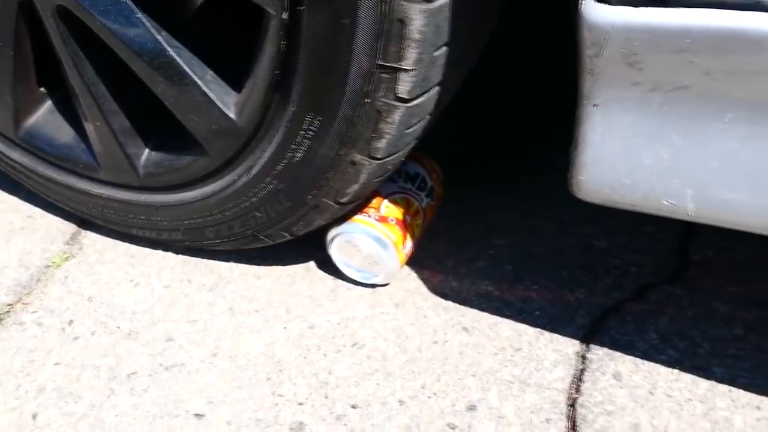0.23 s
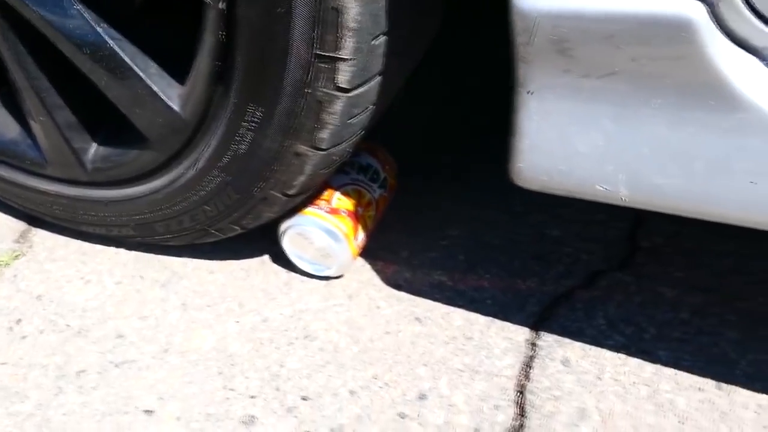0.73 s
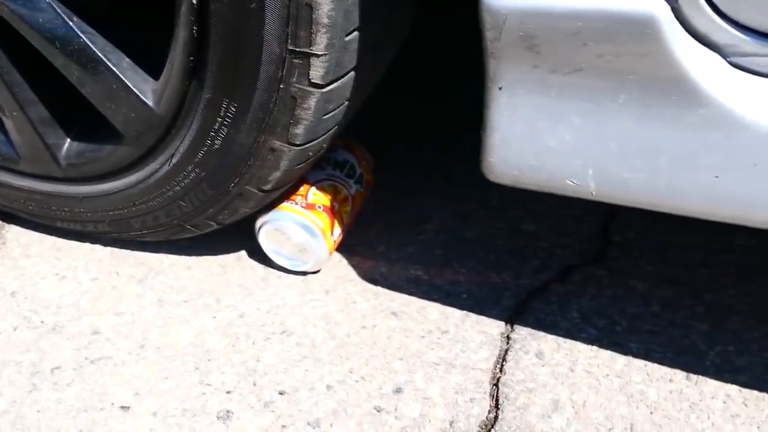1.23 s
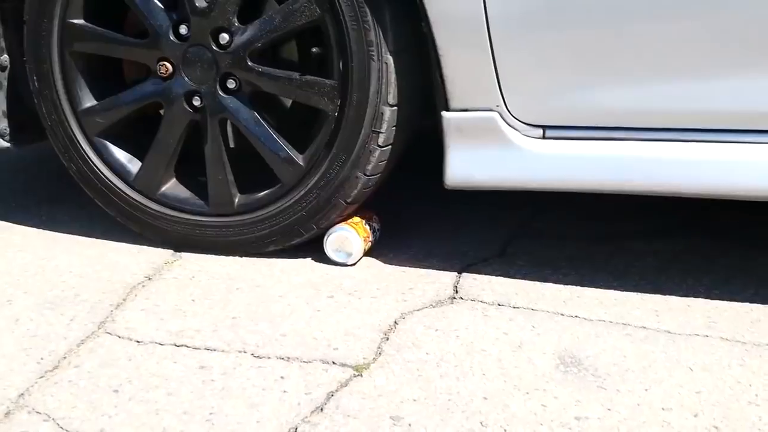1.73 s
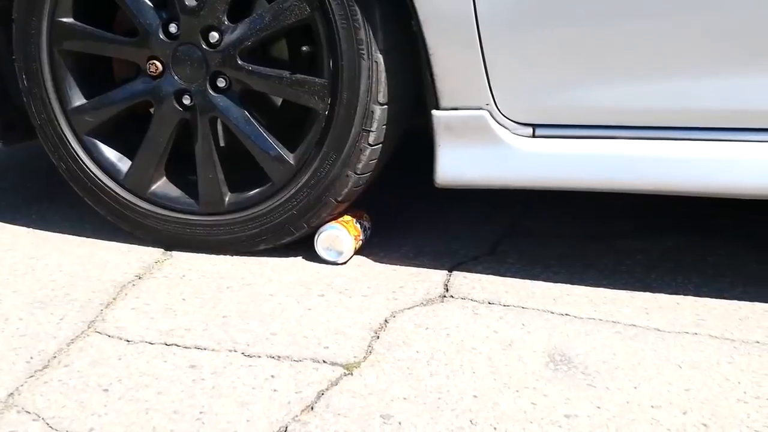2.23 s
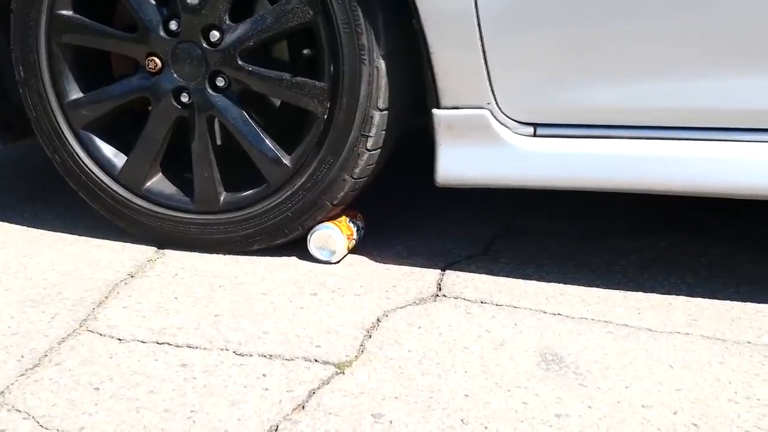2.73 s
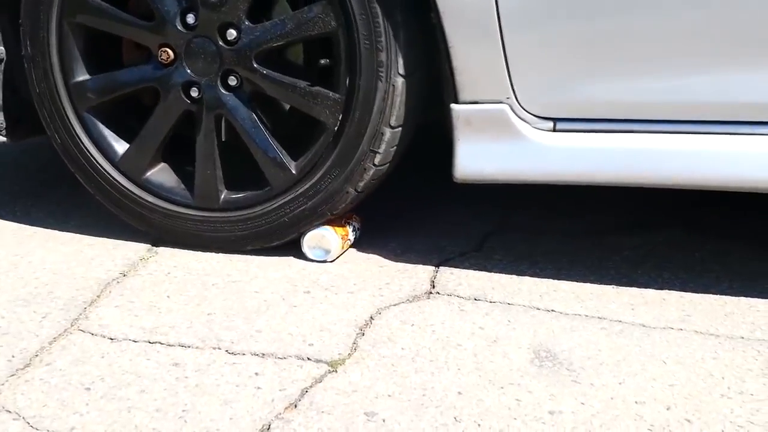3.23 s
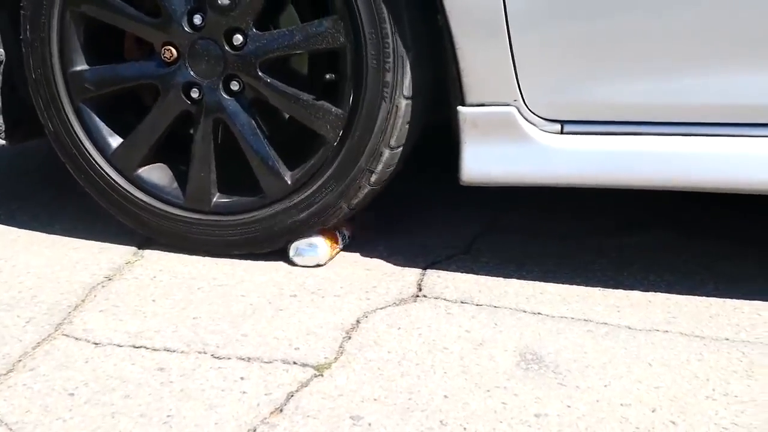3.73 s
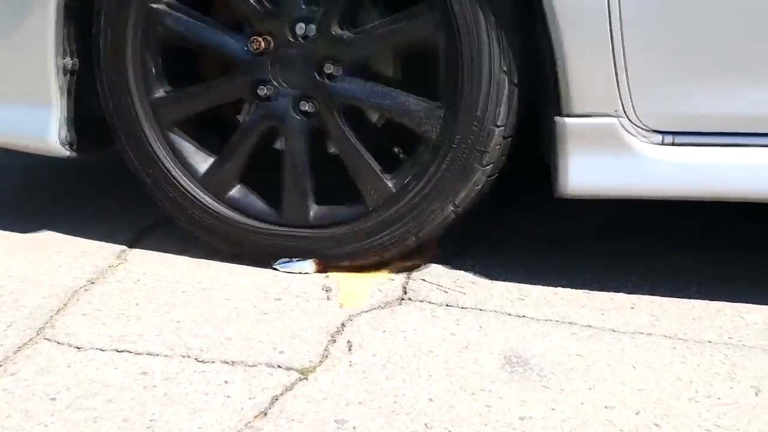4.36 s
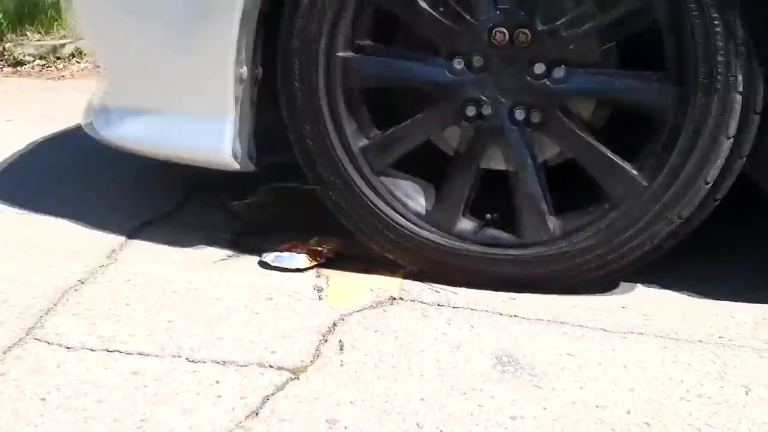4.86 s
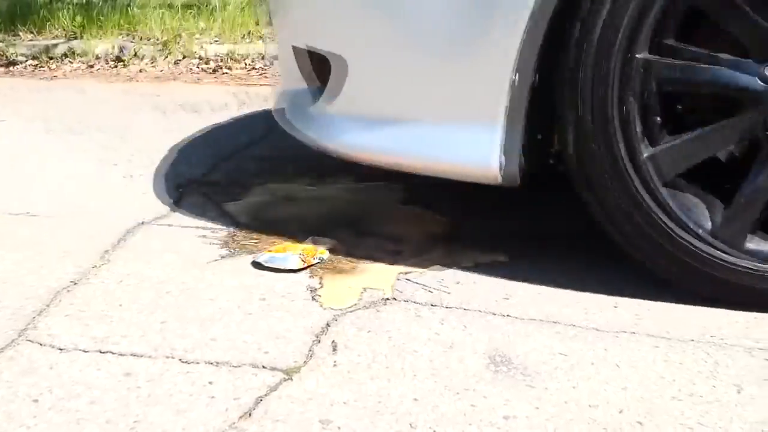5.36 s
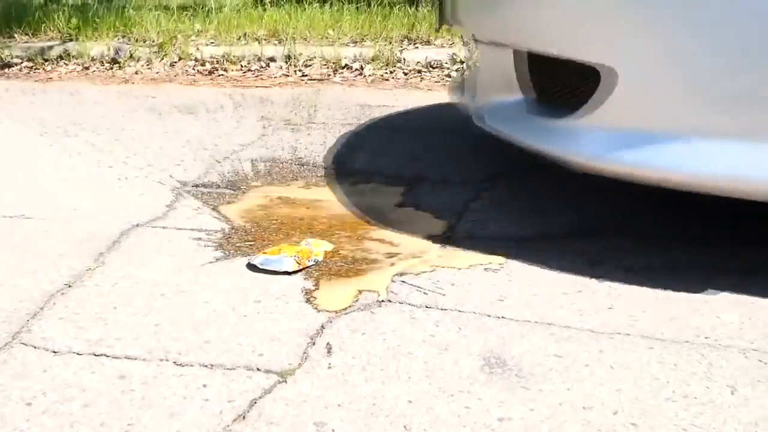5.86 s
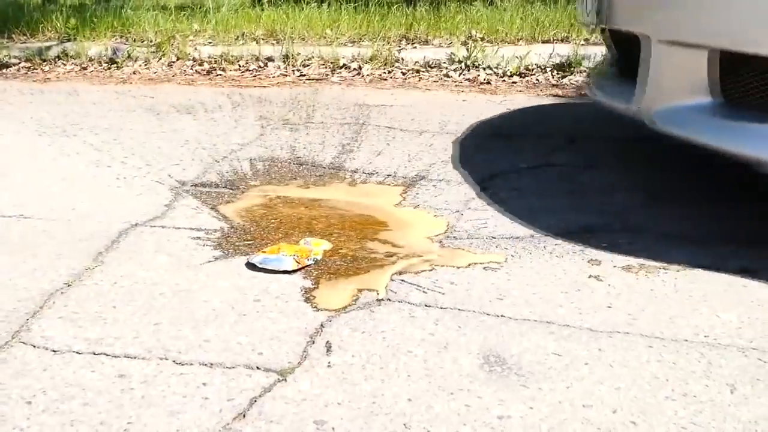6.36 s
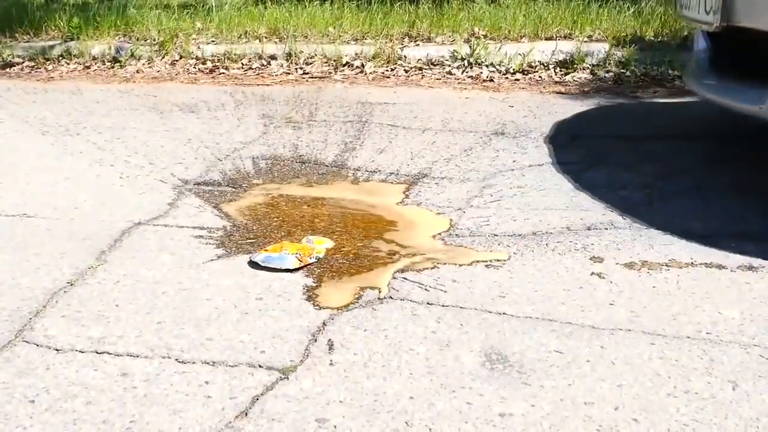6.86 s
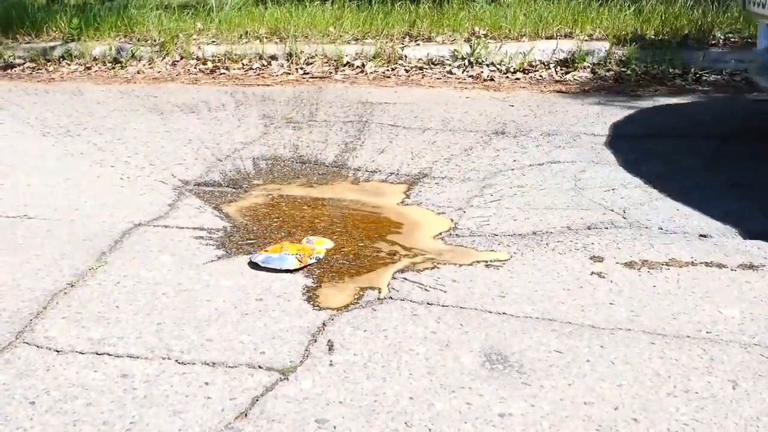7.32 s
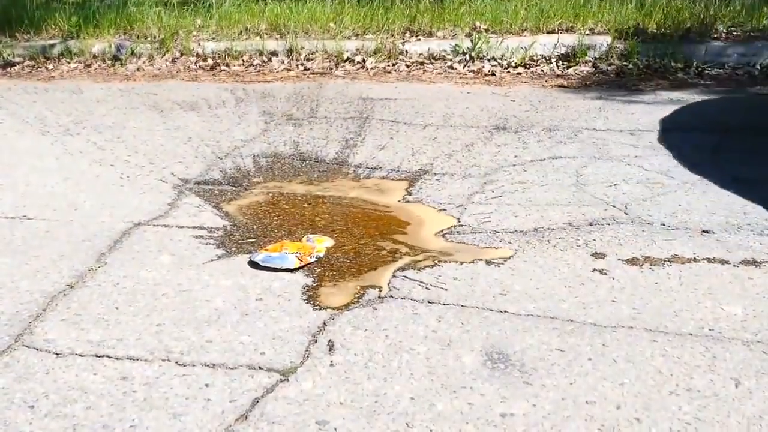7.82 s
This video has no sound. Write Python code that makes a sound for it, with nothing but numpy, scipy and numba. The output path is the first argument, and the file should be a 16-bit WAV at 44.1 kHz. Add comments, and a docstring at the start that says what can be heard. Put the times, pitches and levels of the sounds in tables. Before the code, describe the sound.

Close to the ground outdoors, a tyre slowly presses a drink can. Hollow thuds and thin metallic clicks come in quick irregular succession, strongest at first, then softer and steady. Later the crumple grows rustly, gritty and bubbly with spilling drink. After a short pause a huge bang overloads the close stereo microphone and rings away. Low hum and rumbling sway lie beneath.

```python
"""On the ground, close to a stereo microphone, a tyre creeps over a drink can. The wall buckles in a quick
series of snaps: pulses of air, cracks and knocks of shaped noise, and decaying modes of the hollow body.
Clumped noise rustles as metal and grit, short tones bubble as spilt drink, and slow sines rock the support.
A faint gliding sine squeaks midway; after the last snaps comes a short pause, then a loud burst overloads
the input."""
import sys
import numpy as np
from scipy import signal
from scipy.fft import rfft, irfft, next_fast_len
from scipy.io import wavfile
from scipy.ndimage import uniform_filter1d, map_coordinates
from numba import njit

SR = 44100
rng = np.random.default_rng(int(sys.argv[2]) if len(sys.argv) > 2 else 0)


def wav_record(signal):
    """Record a signal, one row per channel, as 16-bit PCM in the file named by sys.argv[1]."""
    frames = np.transpose(np.atleast_2d(signal))
    bounded = np.clip(frames, -1, 1)
    # unit amplitude maps onto the largest positive 16-bit level
    quanta = np.round(bounded * 32767).astype(np.int16)
    wavfile.write(sys.argv[1], SR, quanta)


N = 356769


def amp(db):
    """Decibel law: level to amplitude ratio."""
    return 10 ** (np.asarray(db) / 20)


def unit(x):
    """Normalisation to unit root-mean-square amplitude."""
    return x / np.sqrt(np.mean(x ** 2) + 1e-20)


def along(points, hz):
    """Interpolation of (f/Hz, value) points on a logarithmic frequency axis."""
    f, v = np.transpose(points)
    return np.interp(np.log(hz + 1), np.log(f + 1), v)


def curves(rows):
    """Linear interpolation in time of each column after t/s, and a gate that is open while the rows last."""
    s, *columns = np.transpose(rows)
    t = np.arange(N) / SR
    gate = np.clip(np.minimum(t - s[0], s[-1] - t) / 0.031, 0, 1)
    return [np.interp(t, s, c) for c in columns] + [gate]


def wobble(rate):
    """Band-limited randomness: a spline through random knots, rate knots a second."""
    knots = rng.standard_normal(int(N * rate / SR) + 4)
    return map_coordinates(knots, [np.arange(N) * rate / SR])


def filtered(x, response):
    """Linear filtering: the spectrum of x times a response of frequency."""
    m = next_fast_len(N + SR // 4)
    x = np.concatenate([x, x[..., :-SR // 8:-1]], axis=-1)  # the end is mirrored so that it does not ring
    return irfft(rfft(x, m) * response(np.fft.rfftfreq(m, 1 / SR)), m)[..., :N]


@njit
def add_decaying_sines(out, at, hz, gain, t60, rate):
    """Damped free vibration: each mode is a rotating and shrinking phasor, cut off after its t60."""
    for k in range(len(hz)):
        step = np.exp((2j * np.pi * hz[k] - np.log(1000) / t60[k]) / rate)
        phasor = gain[k] + 0j
        for i in range(at, min(len(out), at + int(t60[k] * rate))):
            out[i] += phasor.imag
            phasor *= step


# Likeness of left and right: f/Hz, correlation coefficient
LIKENESS = [(60, -0.89), (130, 0.58), (290, 0.87), (640, 0.68), (1410, 0.59), (3100, 0.52), (6820, 0.34),
            (15000, -0.45)]


def spread(pair, spectrum):
    """Interchannel coherence: two unrelated signals are coloured and mixed as mid and side."""
    def turn(hz):
        return np.arccos(np.clip(along(LIKENESS, hz), -1, 1)) / 2

    def response(hz):
        return amp(along(spectrum, hz)) * [np.cos(turn(hz)), np.sin(turn(hz))]

    mid, side = filtered(pair, response)
    return np.array([mid + side, mid - side])


# Spectrum of the steady background: f/Hz, relative level/dB (per Hz)
BACKGROUND_SPECTRUM = [(15, -2), (30, 15), (50, 14.5), (80, -11), (420, -18), (700, -23.5), (1400, -30),
                       (2100, -32.5), (2900, -34.5), (3500, -39.5), (9000, -44.5), (14000, -44),
                       (17000, -62)]
BACKGROUND_DB = -46.5  # rms level/dB re full scale


def background():
    """Stationary coloured noise, partly coherent between the channels."""
    noise = spread(rng.standard_normal((2, N)), BACKGROUND_SPECTRUM)
    return amp(BACKGROUND_DB) * unit(noise)


# Strength of the sway: t/s, relative level/dB
ROCKING = [(.06, -27), (.19, -20), (.32, -32), (1.25, -27), (1.9, -33), (2.55, -23.5), (3.6, -25.5),
           (4.75, -27), (5.0, -31), (5.15, -17), (5.5, -24.5), (6.15, -33), (6.35, -24.5), (6.65, -35),
           (7.3, -26.5), (7.47, -22.5), (7.73, -38)]


def rocking():
    """Low-frequency oscillation: the microphone's support sways unevenly near 26 Hz, out of phase left to right."""
    db, gate = curves(ROCKING)
    phase = 2 * np.pi * np.cumsum(26.0 + 2.14 * wobble(5.1)) / SR
    sway = gate * amp(db + 1.0 + 5.5 * wobble(48)) * np.sin(phase)
    # the burst sets off one clean damped swing
    t = np.maximum(np.arange(N) / SR - 7.903, 0)
    swing = -.85 * amp(-60 * t / 0.88) * np.sin(2 * np.pi * 25 * t)
    return (sway + swing) * [[.85], [-1.15]]


# The clear buckles: t/s, then relative level/dB of knock, crack, body
BUCKLES = [(0.0914, -16, -30.5, -14.5), (0.1185, -22.5, -29, -17.5), (.226, -27, -43.5, -21.5),
           (.2849, -52, -52, -55), (.3053, -28, -48, -22.5), (0.4377, -20.5, -32.5, -20.5),
           (0.4713, -41, -53, -38), (0.5313, -31, -49, -29), (0.5503, -21, -42.5, -21.5),
           (0.623, -35.5, -43.5, -24.5), (0.683, -44, -50, -43), (0.6887, -19, -39.5, -18),
           (.7104, -46, -49, -25.5), (.7982, -50, -46.5, -39), (0.825, -47, -49, -29.5),
           (0.8554, -40, -58, -50), (.864, -25, -42, -15), (0.8876, -24.5, -48, -24),
           (0.9805, -41, -47, -32), (1.013, -33, -44, -23.5), (1.0454, -24.5, -46, -19.5),
           (1.0687, -19.5, -42.5, -18), (1.1802, -38, -41.5, -27.5), (1.2138, -35.5, -41.5, -23.5),
           (1.2608, -29, -51, -18.5), (1.2712, -20, -44, -17.5), (1.3791, -52, -47, -35.5),
           (1.406, -40, -48.5, -26.5), (1.4381, -36, -41, -22), (1.4686, -22, -43, -21),
           (1.5649, -44, -46.5, -32), (1.6063, -36, -47, -27), (1.6277, -29, -41.5, -19),
           (1.6788, -25.5, -38.5, -21), (1.7612, -52, -54, -47), (1.8186, -41, -55, -34),
           (1.8336, -48, -51, -32), (1.8624, -27, -37.5, -21.5), (1.9613, -44, -52, -42.5),
           (2.0136, -48, -50, -32.5), (2.051, -22.5, -50, -18.5), (2.1199, -23.5, -41, -18.5),
           (2.2035, -34, -45.5, -24), (2.2475, -46, -47.5, -39), (2.3081, -31.5, -40.5, -27.5),
           (2.382, -54, -54, -55), (2.424, -32, -43, -25.5), (2.431, -31.5, -47, -25),
           (2.471, -26, -41, -19), (2.518, -25, -46, -30), (2.6074, -40, -47, -41),
           (2.6298, -40, -49, -26.5), (2.6696, -34, -47, -31), (2.7088, -33.5, -42, -32),
           (2.8056, -46, -52, -29), (2.829, -30, -41, -22), (2.8506, -60, -47, -33),
           (2.8979, -37, -54, -30.5), (2.9416, -36, -42, -27.5), (3.05, -39, -46, -29.5),
           (3.1541, -37.5, -44.5, -30), (3.1818, -38, -44, -27.5), (3.283, -53, -53, -31),
           (3.288, -37.5, -41, -24), (3.3847, -33.5, -44, -31), (3.4181, -43, -44, -29),
           (3.521, -33.5, -44, -31.5), (3.6156, -37, -45.5, -29), (3.6505, -42, -46.5, -27.5),
           (3.7426, -33, -44.5, -26.5), (3.754, -57, -47, -28), (3.8455, -37, -45, -35),
           (3.8749, -32.5, -44, -27), (3.9575, -50, -54, -75), (3.977, -67, -55, -28),
           (3.9845, -38, -45, -26.5), (4.071, -47, -47.5, -30), (4.1148, -35, -48, -25.5),
           (4.2025, -33, -50, -44), (4.2105, -31.5, -47, -26.5), (4.3036, -44, -50.5, -25),
           (4.3495, -39, -56, -25), (4.4105, -46, -51, -42), (4.4378, -40, -52, -34),
           (4.4452, -34, -47, -24.5), (4.526, -35.5, -52.5, -28.5), (4.5735, -27.5, -50, -18),
           (4.6537, -43, -47, -36), (4.6666, -53, -46, -28), (4.6781, -39, -50, -24.5),
           (4.781, -36.5, -45, -27.5), (4.8155, -41, -50.5, -29), (4.8996, -46, -44, -40),
           (4.9172, -32.5, -42.5, -24.5), (4.939, -65, -54, -25), (5.0269, -47, -47.5, -36),
           (5.073, -71, -54, -31), (5.1482, -45, -52, -25.5), (5.1843, -28.5, -64, -49),
           (5.214, -51, -52, -25), (5.2869, -16, -57, -14.5), (5.3386, -38, -71, -26.5),
           (5.4338, -63, -68, -27.5), (5.4624, -34, -67, -36), (5.519, -24.5, -44, -40),
           (5.529, -25, -49, -21.5), (5.542, -38, -60, -33), (5.6438, -25.5, -41, -21.5),
           (5.727, -31, -60, -26), (5.7933, -34.5, -51, -42), (5.8372, -19, -51, -18),
           (5.932, -23.5, -51, -30), (5.9811, -20.5, -42, -26.5), (5.9953, -24, -60, -27),
           (6.0362, -28, -40.5, -28.5), (6.1391, -36, -40, -36.5), (6.173, -26, -58, -25.5),
           (6.181, -25.5, -52, -26.5), (6.229, -23, -32.5, -22.5), (6.3161, -29.5, -39.5, -37),
           (6.3476, -27, -46, -31), (6.4166, -37, -43, -38), (6.4772, -33, -49, -42),
           (6.5046, -30, -64, -41), (6.5694, -40, -42, -38), (6.5845, -60, -30, -57),
           (6.6477, -49, -35, -53), (6.6711, -26.5, -57, -34), (6.6824, -31, -51, -31),
           (6.7556, -38.5, -61, -49), (6.779, -60, -37, -47), (6.7949, -33.5, -40, -41),
           (6.8589, -41, -50, -44), (6.8783, -42, -51, -52), (6.889, -23.5, -42, -37),
           (6.9076, -30.5, -45, -33), (6.9393, -41, -40, -36), (6.9912, -26, -43, -29.5),
           (7.023, -31.5, -50, -52), (7.0637, -45, -53, -38), (7.1327, -32.5, -63, -40),
           (7.1502, -23, -51, -32.5), (7.1629, -30, -37, -32), (7.1892, -54, -45, -40),
           (7.226, -23.5, -39, -36.5), (7.268, -29, -50, -42), (7.319, -54, -38, -37),
           (7.349, -37, -58, -38), (7.3742, -32.5, -69, -27), (7.4227, -30.5, -46, -40),
           (7.452, -28.5, -33, -16.5), (7.4664, -35, -50, -38)]
# Blows of the last burst: t/s, then relative level/dB of knock, crack, boom, body, sideways ring
BURST = [(7.8851, 1, -18, -33, -35, -4), (7.8875, -23, -10.5, -21, -0.5, -34),
         (7.8919, -4.5, -9, -1, -36, -5), (7.897, -25, -34, -4.5, -6, -3), (7.909, -13, -29, -9, -9.5, -29),
         (7.926, -12, -33, -21, -36, -20)]
# Low boom of a buckle of average body: t/s, relative level/dB
BOOM = [(.09, -16), (.3, -29.5), (.45, -20), (1, -28.5), (2.3, -25), (2.6, -21.5), (3, -26.5), (3.5, -20.5),
        (4.8, -23), (5.1, -19), (5.45, -24.5), (5.55, -34), (5.85, -25), (6.3, -32.5), (6.55, -34),
        (7.3, -30.5), (7.45, -20.5)]
AVERAGE_BODY_DB, AVERAGE_SIDE_DB = -26, -30  # relative levels of an average buckle
BOOM_FOLLOWS, SIDE_FOLLOWS = 0.27, 0.84  # dB of boom and of sideways ring per dB of body


def blows():
    """Level scaling: boom and sideways ring grow with the body of each buckle; the burst is appended."""
    s, knock_db, crack_db, body_db = np.transpose(BUCKLES)
    above_average = body_db - AVERAGE_BODY_DB
    boom_db = np.interp(s, *np.transpose(BOOM)) + BOOM_FOLLOWS * above_average
    side_db = AVERAGE_SIDE_DB + SIDE_FOLLOWS * above_average
    return list(zip(s, knock_db, crack_db, boom_db, body_db, side_db)) + BURST


def ring(modes, strength, scatter_db, detune):
    """Modal excitation: each blow gives the modes new strengths and slightly new pitches (Hz, gain, t60)."""
    hz, db, t60 = np.transpose(modes)
    luck = rng.standard_normal((2, len(modes)))
    gain = amp(db + along(strength, hz) + scatter_db * luck[0])
    return hz * (1 + detune * luck[1]), gain, np.abs(t60)


# Modes in phase on both sides: nominal f/Hz, relative level/dB, t60/s
CENTRE_MODES = [(54.3, -36, 0.58), (89.2, -7, 0.36), (93.3, -3.5, 0.25), (130, -11.5, 0.53),
                (169.1, -9.5, 0.38), (237.8, 0, 0.099), (302.8, -0.5, 0.091), (443, -15.5, 0.16),
                (561.4, -3, 0.091), (723.4, -15, 0.12), (940, -49, 0.055), (1130, -26, 0.12),
                (1329, -56, 0.11), (1650, -61, 0.035)]
# Modes in opposite phase on the two sides: nominal f/Hz, relative level/dB, t60/s
ACROSS_MODES = [(52.7, -41, 0.33), (88, -4.5, 0.33), (166.4, -2.5, 0.16), (289.4, -3.5, 0.13),
                (302.4, 0, 0.15)]
# Bright crack: f/Hz, relative level/dB (per Hz)
CRACK_SPECTRUM = [(1200, -5.5), (2200, 1.5), (3300, 0.5), (5000, -2), (8000, -5.5), (11000, -5),
                  (15000, -15.5), (17000, -30)]
# Noisy body of a knock: f/Hz, relative level/dB (per Hz)
CRUNCH_SPECTRUM = [(200, -43), (400, -7.5), (600, 4), (1000, -1), (1500, -14), (2000, -22), (4000, -50)]


def buckles(events, count=3):
    """Snap-through buckling: crack, air sucked in, air pushed out, modal ringing; in count interleaved groups."""
    t = np.arange(2400) / SR
    centre, across = np.zeros((2, count, N + SR))
    crunch, crack = np.zeros((2, count, 2, N + SR))
    # the suction deepens, then flips quickly
    suck = -np.exp(-((t - .0017) / np.where(t < .0017, .0008, .00045)) ** 2)
    push = np.exp(-((t - .0032) / 0.0015) ** 2)
    snap = np.exp(-((t - .001) / 0.0011) ** 2) + 0.17 * amp(-60 * t / 0.087)
    rattle = amp(-60 * t / 0.086) * (1 - np.exp(-t / 0.00074))
    for k, (s, knock_db, crack_db, boom_db, body_db, side_db) in enumerate(events):
        group, at = k % count, round(s * SR) - 50
        span = slice(at, at + len(t))
        centre[group, span] += amp(knock_db + 3.0) * suck + amp(body_db - 3.0) * push
        strength = [(95, boom_db - 3.5), (270, body_db - 3), (700, knock_db - 7.5)]
        modes = ring(CENTRE_MODES, strength, scatter_db=2.5, detune=0.0611)
        add_decaying_sines(centre[group], at + 90, *modes, SR)
        modes = ring(ACROSS_MODES, [(300, side_db - 4.5)], scatter_db=5.5, detune=0.034)
        add_decaying_sines(across[group], at + 300, *modes, SR)
        crack[group, :, span] += amp(crack_db) * snap * rng.standard_normal((2, len(t)))
        # the fold pings at two pitches of its own
        fold_hz, fold_gain = 3500 * 3 ** rng.random(2), amp(crack_db - 9.5) * np.ones(2)
        add_decaying_sines(crack[group, 0], at + 30, fold_hz, fold_gain, np.full(2, .004), SR)
        crunch[group, :, span] += amp(knock_db) * rattle * rng.standard_normal((2, len(t)))
    noisy = filtered(crack[..., :N], lambda hz: amp(along(CRACK_SPECTRUM, hz)))
    noisy += filtered(crunch[..., :N], lambda hz: amp(along(CRUNCH_SPECTRUM, hz) + 0.5))
    mid, side = noisy[:, 0], 0.5 * noisy[:, 1] + across[:, :N]
    # the central sound is one sample later and 3 dB weaker on the left
    left = mid + side + amp(-2.5) * np.roll(centre, 1, axis=1)[:, :N]
    right = mid - side + amp(0.5) * centre[:, :N]
    return np.stack([left, right], axis=1)


# Decay of the surroundings: f/Hz, t60/s
DECAY = [(60, 0.49), (300, 0.39), (1000, 0.5), (4000, 0.4), (12000, 0.29)]
# Colour of the echoes: f/Hz, relative level/dB
ECHO_SPECTRUM = [(60, -14.5), (300, -8), (700, -11), (1500, -4.5), (4000, -9), (12000, -9.5)]


def space(groups):
    """Reverberation: each group is convolved with its own noise tail, with a decay rate for each frequency."""
    out = np.zeros((2, N))
    for x in groups.mean(axis=1):
        hz, t, z = signal.stft(rng.standard_normal((2, SR // 2)), SR, nperseg=256)
        decay = amp(-60 * t / along(DECAY, hz)[:, None])
        tail = signal.istft(z * decay, SR, nperseg=256)[1]
        tail /= np.sqrt(along(DECAY, 990) * SR / (2 * np.log(1000)))
        delayed = np.pad(x, (200, 0))[None]
        out += signal.oaconvolve(delayed, tail, axes=1)[:, :N]
    return spread(out, ECHO_SPECTRUM)


# Folds that ring clearly on one pitch: t/s, f/Hz, level/dB, t60/s
PINGS = [(0.0914, 4800, -21, 0.0057), (1.07, 1180, -44, 0.076), (2.121, 1334, -33.5, 0.035),
         (5.185, 1300, -37, 0.039), (5.288, 835, -25.5, 0.019), (7.296, 4400, -25.5, 0.011)]


def pings():
    """Single-mode resonance: one short damped tone from each of these folds."""
    out = np.zeros(N)
    for s, *mode in PINGS:
        hz, db, t60 = np.array(mode)[:, None]
        add_decaying_sines(out, round(s * SR), hz, amp(db), t60, SR)
    return out


# Bed of rustle: t/s, then relative level/dB of scrape, fizz
RUSTLE_BED = [(5.05, -58, -68), (5.36, -61.5, -58), (5.57, -47, -58), (5.75, -58, -79), (6.08, -86, -91),
              (6.21, -46.5, -55), (6.7, -55.5, -67), (6.92, -47.5, -55), (7.3, -41.5, -48.5),
              (7.47, -85, -74)]
# Clear swells of rustle: t/s, length/ms, then relative level/dB of scrape, fizz
SCUFFS = [(.629, 25, -64, -57), (.712, 13, -67, -58), (.857, 5, -63, -46), (1.042, 5.5, -58, -47),
          (1.257, 7.2, -58, -52), (1.437, 6.7, -53, -48), (1.83, 14, -73, -55.5), (1.972, 16, -75, -56),
          (2.05, 6, -52.5, -49), (2.121, 3.8, -46, -63), (2.517, 10, -57, -54), (2.665, 14, -60, -52),
          (2.9, 4.8, -47, -49.5), (3.056, 11, -55.5, -55), (3.535, 61, -65, -65), (3.75, 81, -65, -63.5),
          (5.188, 10, -51, -74), (5.387, 20, -56.5, -72), (5.15, 15, -65, -71), (5.475, 27, -51, -62),
          (5.524, 31, -43.5, -52), (5.577, 11, -46.5, -54), (5.608, 8.9, -47, -59), (5.632, 11, -48, -42),
          (5.732, 9.6, -52, -51), (5.869, 33, -52, -55.5), (5.932, 11, -46.5, -53.5),
          (5.983, 8.4, -46.5, -65), (6.016, 13, -53, -74), (6.039, 10, -49, -52), (6.068, 9.3, -51, -53),
          (6.13, 11, -50.5, -54), (6.168, 53, -49.5, -55.5), (6.234, 20, -49.5, -49),
          (6.35, 20, -46.5, -50), (6.416, 9.2, -52, -59), (6.467, 19, -51, -60), (6.52, 21, -50, -55),
          (6.577, 15, -52.5, -51), (6.622, 23, -49, -47), (6.653, 17, -46, -55), (6.688, 42, -45.5, -49),
          (6.793, 47, -49.5, -49), (6.837, 11, -45, -58), (6.866, 11, -47, -48), (6.896, 64, -48.5, -58),
          (6.95, 23, -49.5, -47), (6.994, 18, -45.5, -45), (7.071, 13, -39.5, -50), (7.15, 33, -46, -59),
          (7.21, 65, -57, -50.5), (7.272, 8.5, -42, -65), (7.304, 13, -44, -45), (7.411, 33, -45.5, -47),
          (7.465, 41, -49, -48)]
# Dull scrape: f/Hz, relative level/dB (per Hz)
SCRAPE_SPECTRUM = [(500, -1), (1200, 5), (2200, 0), (4300, -1.5), (7000, -8), (10000, -83)]
# Bright fizz: f/Hz, relative level/dB (per Hz)
FIZZ_SPECTRUM = [(3000, -50), (6000, -11.5), (8000, 2.5), (11000, -1), (14000, 0), (16500, -23.5)]
# each knock trails a swell: delay, length, and relative levels added to its own
TRAIL_S, TRAIL_MS, TRAIL_SCRAPE_DB, TRAIL_FIZZ_DB = 0.019, 46, -46.5, -45.5


def rustle():
    """Crackling noise: random clumps and tiny snaps of foil make a scrape and a fizz; scuffs swell out of it."""
    scrape_db, fizz_db, gate = curves(RUSTLE_BED)
    power = (gate * amp([scrape_db - 10.0, fizz_db - 6.0])) ** 2
    trails = [(s + TRAIL_S, TRAIL_MS, db + TRAIL_SCRAPE_DB, db + TRAIL_FIZZ_DB) for s, db, *_ in BUCKLES]
    for s, length, *db in SCUFFS + trails:
        span = np.arange(round(s * SR) - 2500, round(s * SR) + 2500)
        swell = np.exp(-np.abs((span / SR - s) * 2000 / length) ** 3)
        power[:, span] += amp(db)[:, None] ** 2 * swell
    clumps_db = 1.28 * wobble(60) + 1.1 * wobble(250)
    snaps = (rng.random(N) < 700 / SR) * amp(np.minimum(3 * rng.exponential(size=N), 9))
    snappy = 1 + 25 * uniform_filter1d(snaps, size=30)
    grain = amp(clumps_db) * rng.standard_normal((2, N)) * snappy
    scrape_level, fizz_level = np.sqrt(power)
    scrape = amp(2.5) * scrape_level * unit(spread(grain, SCRAPE_SPECTRUM))
    fizz = amp(-2.5) * fizz_level * unit(spread(grain[::-1], FIZZ_SPECTRUM))
    return scrape + fizz


# Path of the squeak: t/s, mean f/Hz, relative level/dB
SQUEAK = [(3.42, 10300, -78), (3.46, 10400, -83), (3.5, 11050, -79), (3.56, 10900, -82), (3.63, 10900, -83),
          (3.67, 10900, -82), (3.74, 10600, -92), (3.8, 10700, -84)]


def squeak():
    """Frequency and amplitude modulation: a thin unsteady whistle from rubber sliding on metal."""
    hz, db, gate = curves(SQUEAK)
    cycles = np.cumsum(hz + 220 * wobble(500)) / SR
    return gate * amp(db + 5 + 3.3 * wobble(86)) * np.sin(2 * np.pi * cycles)


# How much loose grit and foil a knock shakes: t/s, relative level/dB
GRIND = [(5.08, 29), (5.3, -33), (6.0, -16.5), (6.35, -2), (6.9, -6.5), (7.25, -2), (7.52, -25)]
# Colour of the grit: f/Hz, relative level/dB (per Hz)
GRIT_SPECTRUM = [(350, -21), (600, 16.5), (1100, -7), (1800, -47), (2600, -22)]
GRIND_RISE_S, GRIND_T60_S = 0.0083, 0.2
BUBBLE_DB = -8.5  # re grit


def grind():
    """Granular excitation: each knock shakes loose dull mid-range grains, and bubbles sound along with them."""
    db, gate = curves(GRIND)
    knock_power, t = np.zeros(N), np.arange(SR // 2) / SR
    for s, knock_db, *_ in BUCKLES:
        knock_power[round(s * SR)] = amp(knock_db) ** 2
    shake = (1 - np.exp(-t / GRIND_RISE_S)) * amp(-60 * t / GRIND_T60_S)
    level = np.sqrt(np.abs(signal.oaconvolve(knock_power, shake ** 2)[:N]))
    grains = (rng.random(N) < 400 / SR) * amp(np.minimum(4 * rng.exponential(size=N), 12))
    lumps = amp(3.6 * wobble(35)) * (1 + 60 * uniform_filter1d(grains, size=70))
    grit = unit(spread(lumps * rng.standard_normal((2, N)), GRIT_SPECTRUM))
    return gate * level * amp(db - 8) * (grit + amp(BUBBLE_DB) * bubbles())


BUBBLES_PER_S, BUBBLES_LAST_S = 400, 2.5
BUBBLE_HZ, BUBBLE_SPREAD, BUBBLE_T60_CYCLES = 1637, 0.39, 16.6  # spread: sd of log pitch


def bubbles():
    """Bubble resonance: drink squeezed through the folds gives short tones at scattered pitches and sizes."""
    out = np.zeros(N)
    for when, pitch, size in rng.random((int(BUBBLES_PER_S * BUBBLES_LAST_S), 3)):
        # sqrt(12) gives the uniform draw unit deviation
        hz = BUBBLE_HZ * np.exp(BUBBLE_SPREAD * np.sqrt(12) * (np.array([pitch]) - .5))
        at = int((GRIND[0][0] + BUBBLES_LAST_S * when) * SR)
        add_decaying_sines(out, at, hz, amp([12 * size]), BUBBLE_T60_CYCLES / hz, SR)
    return unit(out)


def scene():
    """Superposition of all sources; buckles, rustle and grind also excite the surroundings."""
    groups = buckles(blows())
    groups[0] += rustle() + grind()
    direct = groups.sum(axis=0)
    return background() + rocking() + direct + space(groups) + pings() + squeak()


BAND_LIMIT_HZ = 16450


def record(dry):
    """Saturation and band limiting: peaks flatten towards 0.96, then a 3 Hz high-pass and a sharp upper cut."""
    clipped = dry / (1 + np.abs(dry / .96) ** 8) ** (1 / 8)
    limited = filtered(clipped, lambda hz: (hz < BAND_LIMIT_HZ) * 1j * hz / (1j * hz + 3))
    return np.clip(limited, -1, 1)


dry = scene()
out = record(dry)
wav_record(out)
```